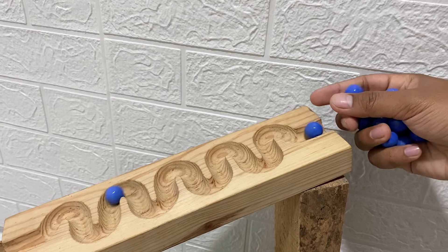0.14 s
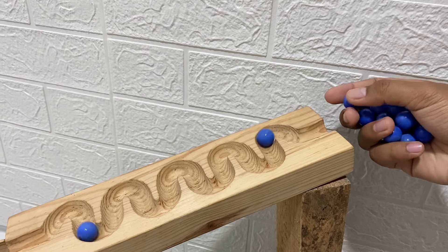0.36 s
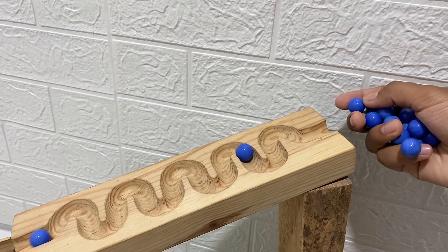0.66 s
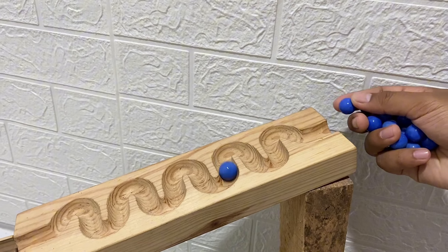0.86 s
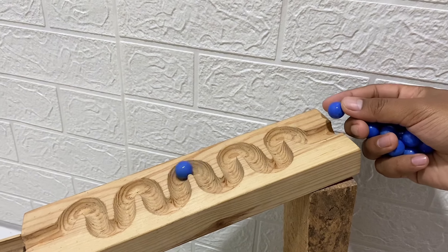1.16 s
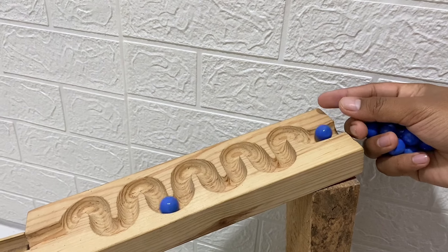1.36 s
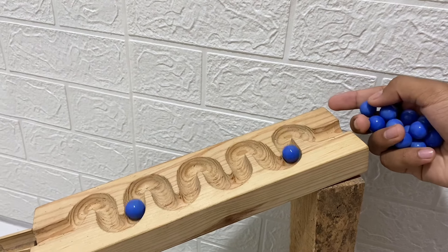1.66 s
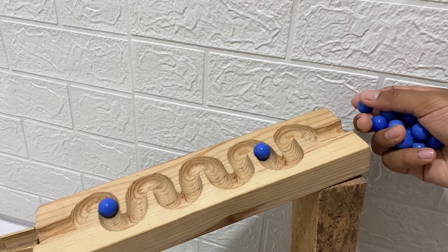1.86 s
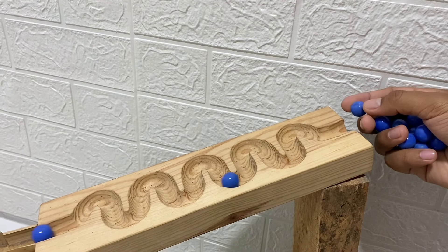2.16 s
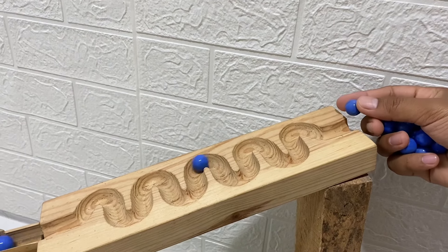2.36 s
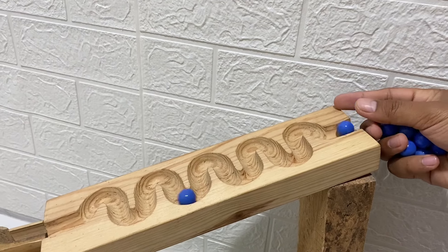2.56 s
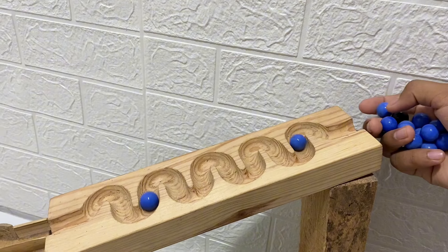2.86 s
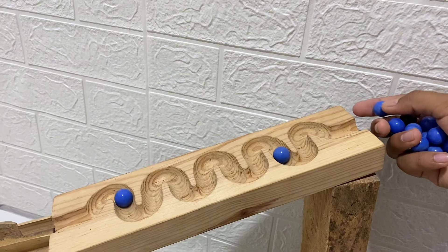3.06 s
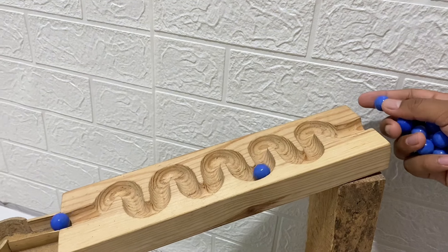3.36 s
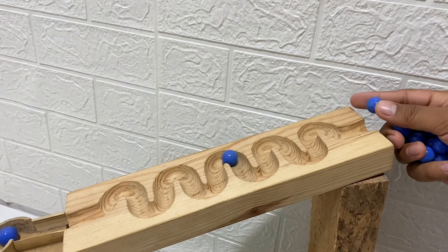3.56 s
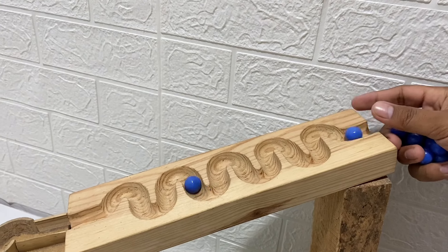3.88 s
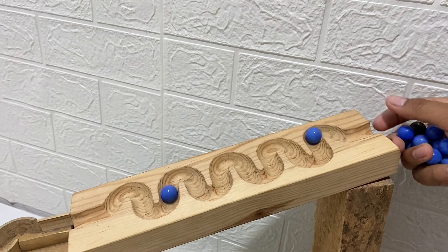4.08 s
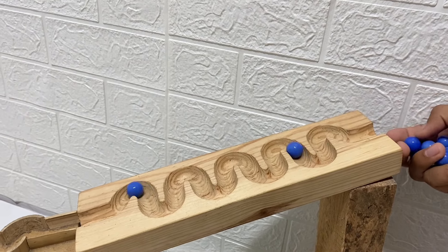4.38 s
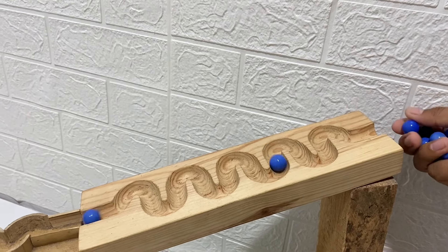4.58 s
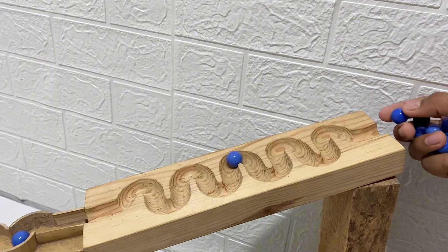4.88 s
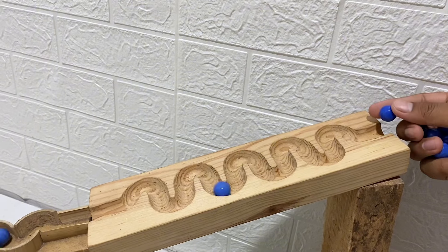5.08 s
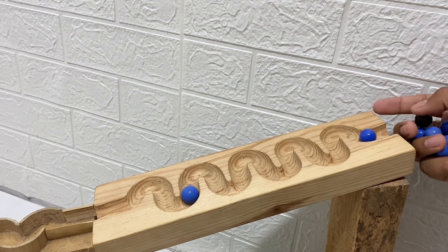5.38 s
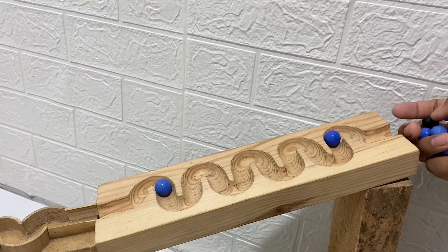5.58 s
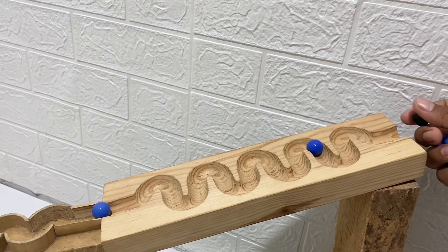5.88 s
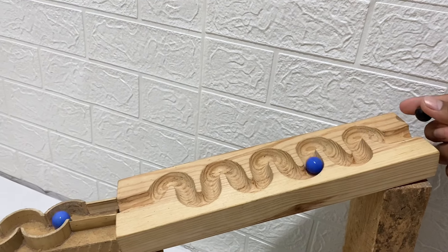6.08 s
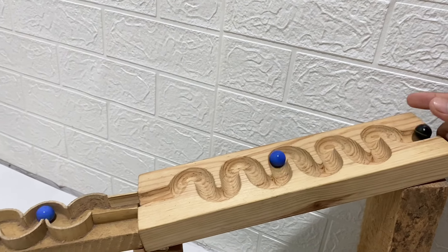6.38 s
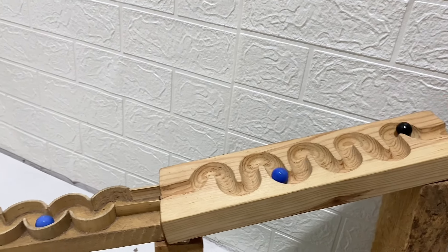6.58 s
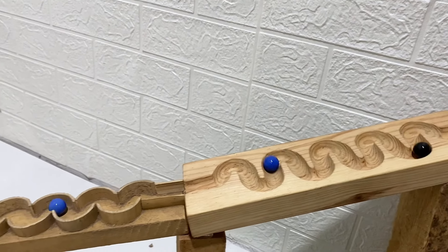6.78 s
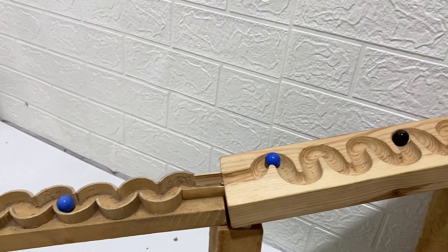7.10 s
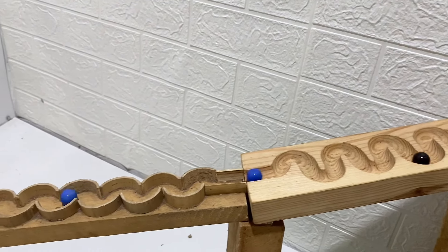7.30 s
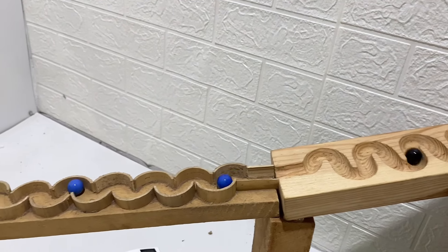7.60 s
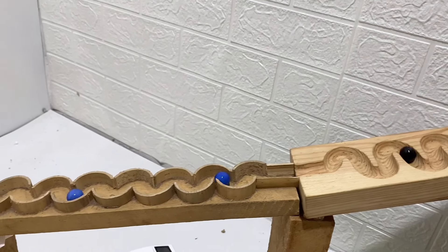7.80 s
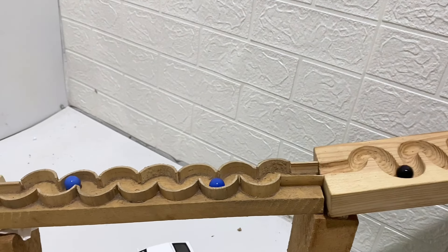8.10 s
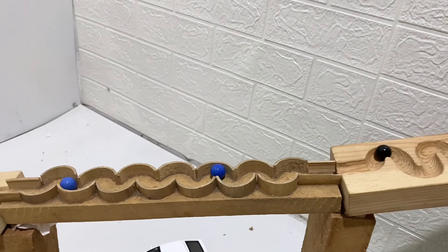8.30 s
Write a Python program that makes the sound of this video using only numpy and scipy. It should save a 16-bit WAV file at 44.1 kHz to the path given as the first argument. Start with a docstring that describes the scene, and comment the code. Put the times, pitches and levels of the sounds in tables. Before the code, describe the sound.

Small glass marbles are fed one by one into a winding wooden groove. Hard woody clacks and sharp ticks come in the first second and a half, then lighter irregular taps over a grainy rolling rumble. Near six seconds two loud cracks ring out, then fuller rolling and scattered clicks follow as marbles reach a lower track. Close stereo microphone, small bare room with short echo, low wavering hum behind.

```python
"""A low wavering motor hum and a soft rumble come first: glass marbles, fed one by one from a cupped
hand, run down winding wooden tracks in a bare room. Random bumps make the rolling, dying sines the knocks
on wood at each bend, short noise bursts the ticks of glass on glass and hard floor. The hum is a stack
of sines over dull noise, the room a random echo tail, and some marbles drone through a moving resonance."""
import sys
import numpy as np
from scipy import signal
from scipy.fft import rfft, irfft, next_fast_len
from scipy.io import wavfile
from scipy.ndimage import uniform_filter1d

SR = 44100
rng = np.random.default_rng(int(sys.argv[2]) if len(sys.argv) > 2 else 0)


def materialize(psi):
    """Save the field psi as 16-bit PCM at rate SR to the path in sys.argv[1].

    A 1-D psi becomes a single channel; in a 2-D psi each row is a channel.
    """
    bounded = np.clip(np.atleast_2d(psi).T, -1, 1)
    quanta = np.round(bounded * 32767).astype(np.int16)
    wavfile.write(sys.argv[1], SR, quanta)


N = 372644


def gain_of(db):
    """Turns decibels into a factor."""
    return 10 ** (np.asarray(db) / 20)


def evened(x):
    """Scales to an average (rms) strength of 1."""
    return x / np.sqrt(np.mean(x ** 2) + 1e-20)


def peaked(x):
    """Scales so the highest peak is 1."""
    return x / abs(x).max()


def read(points, hz):
    """Reads a table of (pitch, value) between its points, on a log-pitch axis."""
    f, value = np.transpose(points)
    return np.interp(np.log(hz + 1), np.log(f + 1), value)


def along(rows, column):
    """Makes a smooth volume curve from one dB column of a time table."""
    rows = np.array(rows)
    return gain_of(np.interp(np.arange(N) / SR, rows[:, 0], rows[:, column]))


def slow(seconds, count):
    """Makes smooth random drifts of rms 1; longer seconds drift more slowly."""
    step = 100  # samples between drift points
    rough = rng.standard_normal((count, N // step + 2))
    span = max(round(seconds * SR / step), 1)
    smooth = evened(uniform_filter1d(uniform_filter1d(rough, span), span))
    return [np.interp(np.arange(N) / step, np.arange(len(row)), row) for row in smooth]


def rings(hz, db, t60, phase, size):
    """Adds up dying sines; t60 is the time each takes to fall by 60 dB."""
    t = np.arange(size)[:, None] / SR
    return (gain_of(db - 60 * t / t60) * np.sin(2 * np.pi * hz * t + phase)).sum(1)


def bumps(per_s, spread_db, size):
    """Makes a random train of the tiny impacts of a rolling marble, a few of them large."""
    height = gain_of(spread_db * np.minimum(rng.exponential(1, (2, size)), 5))
    sign = rng.choice([-1., 1.], (2, size))
    return height * sign * (rng.random((2, size)) < per_s / SR)


# how alike left and right are in diffuse sound: (pitch [Hz], likeness [0-1])
LIKENESS = [(60, 1), (200, 0.88), (700, 0.4), (2000, 0.058), (8000, 0.35)]


def shaped(pair, db_of):
    """Colours two unrelated signals and makes them alike band by band, as two close microphone ports hear."""
    size = next_fast_len(pair.shape[1], True)
    hz = np.fft.rfftfreq(size, 1 / SR)
    left, other = rfft(pair, size)
    same = np.clip(read(LIKENESS, hz), 0, 1)
    right = same * left + np.sqrt(1 - same ** 2) * other
    return irfft(np.array([left, right]) * gain_of(db_of(hz)), size)[:, :pair.shape[1]]


# the distant motor before its random drift: (time [s], pitch [Hz], level within the hum [dB])
MOTOR_PATH = [(0, 33, 1), (1.3, 35, -2), (1.7, 34.6, 0), (2.2, 33.2, -1.5), (2.701, 35, -6),
              (3.4, 37.8, -2), (4, 36, 0), (5.8, 38, -7), (7.8, 37.45, -9), (8.45, 29.9, -2)]
# the tones of the hum before they swell: (multiple of the motor pitch, relative level [dB])
HUM_TONES = [(1, -21), (2, 1.5), (3, -3.5), (4, -9.5), (5, -11.5), (6, -14.5), (9, -14.5)]


def motor():
    """Stacks multiples of one drifting pitch, each swelling and fading on its own."""
    pitch = np.interp(np.arange(N) / SR, *np.transpose(MOTOR_PATH)[:2])
    wavering = pitch * (1 + .008 * slow(0.28, count=1)[0])
    turns = np.cumsum(wavering) / SR
    tones = np.zeros(N)
    for (multiple, db), swell in zip(HUM_TONES, slow(0.093, count=len(HUM_TONES))):
        wave = np.sin(2 * np.pi * (round(multiple) * turns + rng.random()))
        tones += gain_of(db + 2.4 * swell) * wave
    return along(MOTOR_PATH, column=2) * evened(tones)


# colour of the room air: (pitch [Hz], relative level [dB per Hz])
AIR_COLOUR = [(25, -19), (72, 7.5), (120, -7.5), (250, -12.5), (350, -7), (600, -15), (1500, -15),
              (4000, -49.5)]


def room_air():
    """Colours steady noise into the dull wash of room air."""
    return evened(shaped(rng.standard_normal((2, N)), lambda hz: read(AIR_COLOUR, hz)))


# base level of motor and air together: (time [s], level [dB])
HUM_LEVEL = [(0, -53), (.5, -43.5), (2.3, -48.5), (3.6, -49.5), (5.2, -52), (5.8, -45.5), (6.4, -49.5),
             (8.45, -50)]
# the hum dips briefly after two sharp cracks: (time [s], change of level [dB])
HUM_DIPS = [(1.021, -16), (6.05, -13)]
DIP_S = 0.088  # from the middle of a dip to where it is 1/e as deep in dB
AIR_DB = -1  # air level within the hum


def hum():
    """Mixes the motor tones with room air and lets the level drift and dip."""
    t = np.arange(N) / SR
    dip_db = sum(db * np.exp(-((t - s) / DIP_S) ** 2) for s, db in HUM_DIPS)
    return gain_of(dip_db) * along(HUM_LEVEL, column=1) * (motor() + gain_of(AIR_DB) * room_air())


# modes (natural tones) of the tracks, before each sound bends them:
# (pitch [Hz], relative level when knocked [dB], t60 [s], relative level when rolled on [dB])
WOOD_MODES = [(305, -5.5, 0.058, -33.5), (344, -6.5, 0.07, -5), (563, -6.5, 0.04, -40.5),
              (845, 9, 0.021, 12.5), (1043, 6.5, 0.025, 19), (1158, -5, 0.076, 21), (1287, -6, 0.052, 19.5),
              (1567, -8, 0.073, 21), (1733, 5, 0.026, 20), (1995, -1.5, 0.047, -6.5), (2161, 1, 0.044, 16),
              (2353, -5, 0.079, -24), (2700, 1, 0.038, -1), (3051, -3, 0.047, -25),
              (3244, -5.5, 0.055, -31.5), (3384, 2.5, 0.024, -28.5), (3736, -3, 0.032, -49.5),
              (4086, -8.5, 0.034, -23), (4783, -22, 0.028, -46), (5810, -41.5, 0.021, -43.5)]
DETUNE = 0.028  # the marble's place and weight shift a mode by up to half this share


def grain_rumble():
    """Lets bumps on the wood grain ring the track, damped by the marble's weight."""
    hz, _, t60, db = np.transpose(WOOD_MODES)
    body = rings(hz, db, 0.68 * t60, 0, size=4000)
    ringing = signal.oaconvolve(bumps(1500, 3.65, size=N), body[None], axes=1)[:, :N]
    return evened(shaped(ringing, np.zeros_like)) * gain_of(0.97 * slow(.025, count=1)[0])


def wall_taps():
    """Taps the groove wall now and then; an uneven handful of modes sounds briefly."""
    hz, knock_db, t60, _ = np.transpose(WOOD_MODES)
    taps, train = np.zeros(N), bumps(35, 3, size=N)[0]
    size = 1500
    onset = np.minimum(np.arange(size) / SR / 0.0017, 1)
    places = np.flatnonzero(train)
    for at, (spread, shift) in zip(places, rng.random((len(places), 2, len(hz)))):
        part = taps[at:at + size]
        tap_db = knock_db + 22 * spread - 8.2 * abs(np.log2(hz / 2200))
        tuned = hz * (1 + DETUNE * (shift - .5))
        tap = peaked(rings(tuned, tap_db, 1.06 * t60, 0, size=size) * onset)
        part += train[at] * tap[:len(part)]
    return evened(taps)


# colour of the fine grit: (pitch [Hz], relative level [dB per Hz])
GRIT_COLOUR = [(2000, -9), (3000, 1.5), (5300, -7.5), (8500, -22), (10100, -16), (12100, -27.5),
               (14300, -23.5), (16000, -51.5)]


def grit_treble():
    """Turns many fine bumps into a gritty treble that flickers."""
    grit = shaped(bumps(6000, 2.5, size=N), lambda hz: read(GRIT_COLOUR, hz))
    return evened(grit) * gain_of(5.1 * slow(0.023, count=1)[0])


# base levels of rolling in the grooves: (time [s], rumble level [dB], gritty treble level [dB])
ROLLING_LEVELS = [(0, -55, -53.5), (.3, -47, -53), (.9, -47, -79), (1.3, -55.5, -53), (2.0, -51.5, -72),
                  (2.45, -48, -54), (2.75, -49.5, -75), (3.15, -54.5, -77.5), (3.5, -55, -68),
                  (4.05, -55, -60.5), (4.301, -59.5, -68), (4.8, -50.5, -63), (5.12, -61.5, -86),
                  (5.3, -47.5, -75), (5.7, -57, -67), (6.2, -46.5, -53), (7.2, -43, -72), (7.9, -43.5, -63),
                  (8.45, -50, -64)]


def rolling():
    """Rolls marbles along the grooves: grain rumble, wall taps and fine grit, a little to the left."""
    wood = grain_rumble() + gain_of(-9) * wall_taps()
    rumble = along(ROLLING_LEVELS, column=1) * wood
    treble = along(ROLLING_LEVELS, column=2) * grit_treble()
    return gain_of([[1.5], [-1.5]]) * (rumble + treble)


FAINT_PER_S = 20
FAINT_DB, FAINT_SPREAD_DB = 14.5, 4.5  # over the base level of the gritty treble; random spread


def faint_ticks():
    """Lists small ticks at random moments, louder while the rolling is gritty."""
    s, _, grit_db = np.transpose(ROLLING_LEVELS)
    when, size, dull = rng.random((round(FAINT_PER_S * N / SR), 3)).T
    when = .01 + when * (N / SR - .01)
    peak_db = np.interp(when, s, grit_db) + FAINT_DB - FAINT_SPREAD_DB * np.log(size + 0.06)
    return list(zip(when, peak_db, 0.54 + 0.38 * dull))


KNOCK_SIZE = 4000  # samples in one blow
LOW_HZ = 1500  # modes below this are the low ones
SKEW = 0.99  # most radians by which the wood's ring differs between the two ports
LINGER = 1.38  # the main mode rings this much longer
CRACK_DB, CRACK_T60 = -20, 0.031  # level under the ring; time [s] to fall by 60 dB
CRACK_BAND = signal.butter(2, [700, 5500], "band", fs=SR)  # Hz
CHATTER_S, CHATTER_DB, CHATTER_FADE_DB = .06, -16.5, -14.5  # span, first level, fade over the span


def crack():
    """Blurs the many small modes of the wood into a short noise."""
    fade = gain_of(-60 * np.arange(KNOCK_SIZE) / SR / CRACK_T60)
    noise = signal.lfilter(*CRACK_BAND, rng.standard_normal((2, KNOCK_SIZE))) * fade
    return peaked(noise + noise[::-1] / 2)  # each side also hears half of the other


def rebounds(late, sign):
    """Makes a blow followed by a few small rebounds, the later the weaker."""
    train = np.zeros(round(CHATTER_S * SR) + 200)
    at = (200 + late * CHATTER_S * SR).astype(int) - 1
    train[at] = sign * gain_of(CHATTER_DB + CHATTER_FADE_DB * late)
    train[0] = 1
    return train


def add(mix, s, sound, pan_db):
    """Places a sound at its time, between left and right."""
    part = mix[:, round(s * SR):][:, :sound.shape[1]]
    part += gain_of([[pan_db / 2], [-pan_db / 2]]) * sound[:, :part.shape[1]]


# marble against wood or floor: (time [s], level of the blow before panning [dB], strongest pitch [Hz])
KNOCK_ROWS = [(0.084, -24, 2000), (0.089, -11.5, 1136), (0.152, -20, 1120), (0.188, -2.5, 1700),
              (0.242, -20, 1740), (0.742, -25, 2730), (0.755, -22.5, 2730), (0.813, -12.5, 2160),
              (0.839, -34, 2160), (0.935, -8.5, 2030), (1.111, -36.5, 2170), (1.27, -2.5, 1740),
              (1.341, -15, 1730), (1.351, -18, 3120), (1.389, -22.5, 1820), (1.473, -30.5, 1410),
              (1.98, -29, 1170), (2.205, -20.5, 1920), (2.294, -13.5, 2176), (2.449, -28, 2160),
              (2.506, -29.5, 1150), (2.546, -21.5, 1960), (2.56, -21.5, 1140), (2.753, -32, 1030),
              (2.857, -28, 1724), (3.22, -38.5, 2206), (3.33, -32.5, 1280), (3.356, -30, 3100),
              (3.372, -26, 1990), (3.439, -16, 2160), (3.596, -28.5, 2160), (3.714, -32, 2160),
              (3.79, -26, 1123), (3.83, -23.5, 1990), (3.843, -22.5, 3260), (3.862, -24, 1220),
              (3.891, -31, 1160), (3.956, -12, 1290), (3.977, -24.5, 1740), (4.04, -33.5, 1150),
              (4.361, -34.5, 2230), (4.408, -45, 2160), (4.459, -33, 3140), (4.527, -35, 2160),
              (4.622, -32, 1160), (4.645, -31.5, 1150), (4.688, -11.5, 2160), (4.722, -20, 2160),
              (4.8, -44, 3700), (4.844, -23.5, 2160), (4.903, -32, 1570), (4.974, -40, 2160),
              (4.999, -35, 1283), (5.011, -36, 2170), (5.171, -36.5, 2150), (5.268, -23.5, 1125),
              (5.288, -24, 1980), (5.302, -23.5, 3260), (5.319, -29, 1150), (5.329, -21, 1180),
              (5.395, -32.5, 2160), (5.451, -44, 1290), (5.49, -19.5, 1288), (5.534, -22, 1310),
              (5.565, -30, 1290), (5.633, -42, 2160), (5.694, -46, 2160), (5.724, -41, 2160),
              (5.818, -32, 2160), (5.887, -22.5, 2010), (5.948, -14.5, 2147), (5.956, -4.5, 2598),
              (6.201, -15.5, 1570), (6.274, -0.5, 1745), (6.329, -15.5, 2700), (6.34, -16, 1570),
              (6.361, -26, 2700), (6.402, -15.5, 1132), (6.469, -17, 1170), (6.498, -12.5, 1290),
              (6.653, -32.5, 2160), (6.981, -28, 1040), (7.01, -32, 1150), (7.017, -44, 3050),
              (7.055, -30.5, 2200), (7.102, -34, 1570), (7.137, -31.5, 1567), (7.244, -49, 2160),
              (7.357, -19.5, 2720), (7.427, -15, 2160), (7.581, -31.5, 2200), (7.763, -19.5, 2020),
              (7.797, -31, 1290), (7.81, -22, 1290), (7.845, -15.5, 1560), (7.865, -24.5, 2720),
              (7.974, -16, 2280), (8.004, -14, 2800), (8.015, -12.5, 2720), (8.025, -21.5, 1170),
              (8.212, -31, 578)]
# each pitch belongs to a spot on the tracks: (pitch [Hz], how far it stands out [dB], low modes [dB],
# left over right [dB], partner mode [Hz], how far the partner stands out [dB], rise time [s])
TRACK_SPOTS = [(1158, 8.5, 1.5, 3.5, 2600, 16, 0.0017), (1305, 16, -4, 6, 3057, 13.5, 0.0033),
               (1520, 12, -9, 8, 1900, 22, 0.0004), (1730, 7.5, -4.5, 3.5, 858, 8, 0.00094),
               (2080, 5, -4.5, 5, 4110, 0, 0.00065), (2084, 13.5, -6, 7, 3732, 14, 0.00088),
               (2314, 9.5, -3, 5, 626, 21, 0.0014), (2650, 6, -5.5, 5, 990, 11, 0.00081),
               (3200, 4, 7.5, 2, 1400, 14, 0.001)]


def knocks():
    """Strikes spots that favour two modes and scatter the rest; hard blows die sooner, then rebound."""
    hz, db, t60, _ = np.transpose(WOOD_MODES)
    spot_hz = np.transpose(TRACK_SPOTS)[0]
    skew = SKEW * np.clip(hz / LOW_HZ, 0, 1)
    t = np.arange(KNOCK_SIZE) / SR
    out = np.zeros((2, N))
    draws = rng.random((len(KNOCK_ROWS), 4, len(hz)))
    for (s, peak_db, ring_hz), (spread, phase, shift, hops) in zip(KNOCK_ROWS, draws):
        spot = TRACK_SPOTS[abs(np.log(spot_hz / ring_hz)).argmin()]  # nearest in pitch
        _, stand_db, low_db, pan_db, partner_hz, partner_db, rise_s = spot
        # closeness of every mode to the main pitch and to its partner, 0-1
        first, second = np.exp(-(np.log2(hz / [[ring_hz], [partner_hz]]) / 0.067) ** 2)
        favour_db = stand_db * first + partner_db * second
        favour_db = favour_db * np.interp(peak_db, [-12, -3], [1, .6])  # less on hard blows
        octaves = abs(np.log2(hz / ring_hz))
        place_db = favour_db - 3 * octaves + 7 * (spread - .5) + low_db * (hz < LOW_HZ)
        length = np.interp(peak_db, [-16, -6], [.8, .5]) * LINGER ** first * 0.8 ** second
        tuned = hz * (1 + DETUNE * (1 - first) * (shift - .5))
        ring = np.array([
            rings(tuned, db + place_db, t60 * length, 1.77 * phase + side * skew, size=KNOCK_SIZE)
            for side in (-.5, .5)])
        blow = peaked(ring) + gain_of(CRACK_DB) * crack()
        blow = peaked(blow * (1 - np.exp(-(t / rise_s) ** 2)))  # soft start
        train = rebounds(hops[:5], np.sign(hops[5:10] - .5))
        add(out, s, gain_of(peak_db) * signal.fftconvolve(blow, train[None], axes=1), pan_db)
    return out


# hard glass contact: (time [s], peak level [dB], share of dull colour [0-1])
TICK_ROWS = [(0.0884, -15.5, 0.99), (0.1882, -9.5, 0.4), (0.3055, -25, 0), (0.39, -26.5, 0.1),
             (0.4272, -16.5, 0.07), (0.4756, -21, 0.08), (0.554, -21, 0.4), (0.6035, -17, 0.26),
             (0.8131, -37, 0.97), (0.924, -22, 0.5), (0.9331, -3, 0.19), (1.1108, -25.5, 0.92),
             (1.27, -13.5, 0.03), (1.3396, -27, 0.5), (1.4426, -31.5, 0.99), (1.985, -34, 0.5),
             (2.151, -24, 0.25), (2.2935, -23, 1), (2.3181, -21, 0.36), (2.4505, -20.5, 0.27),
             (2.562, -23.5, 0.89), (2.608, -28, 0.9), (2.6292, -22, 0.4), (2.753, -40, 0.8),
             (2.773, -33, 0.96), (2.9288, -30.5, 0.85), (2.985, -35, 0.5), (3.049, -34, 1), (3.109, -42, 1),
             (3.218, -29, 0.98), (3.3305, -34, 0.94), (3.4172, -20.5, 0.23), (3.481, -20.5, 0.84),
             (3.556, -24, 0.97), (3.7138, -24.5, 0.98), (3.7943, -37, 0.9), (3.9577, -25, 1),
             (4.0205, -23.5, 0.53), (4.335, -36.5, 0.78), (4.5121, -26, 0.93), (4.6091, -21, 0.18),
             (4.6513, -23, 0.93), (4.6897, -20.5, 1), (4.8, -26, 1), (4.845, -22.5, 0.9),
             (4.9018, -18, 0.94), (4.9625, -25, 0.99), (5.011, -29.5, 1), (5.1671, -25, 0.73),
             (5.2738, -40, 0.4), (5.301, -30, .9), (5.394, -41, 0.88), (5.562, -25.5, 0.4),
             (5.57, -37, .95), (5.627, -35, 1), (5.692, -42.5, 0.94), (5.8006, -25.5, 0.94),
             (5.9455, -21, 0.8), (5.9562, -4.5, 0.06), (6.175, -31, 0.8), (6.197, -28, 0.96),
             (6.2753, -10.5, 0.2), (6.3414, -18.5, 0.73), (6.401, -24, 1), (6.4685, -19, 1),
             (6.61, -23.5, 0.97), (6.6432, -29.5, 0.92), (6.761, -48, 0.4), (6.7754, -19, 0),
             (6.7864, -20, 0.1), (6.7979, -18.5, 0.14), (6.8208, -18.5, 0.15), (6.8746, -26, 0.7),
             (6.9458, -19, 0.13), (6.9583, -14.5, 0.13), (7, -19, 0.3), (7.017, -25, 0.55), (7.096, -37, 1),
             (7.2083, -27.5, 0.04), (7.2659, -17, 0.93), (7.4086, -22, 0.8), (7.443, -19.5, 0.66),
             (7.5425, -26, 0.78), (7.5752, -27, 0.66), (7.6426, -28, 0.85), (7.715, -26.5, 0.95),
             (7.8426, -33, 0.76), (7.981, -20.5, 1), (8.1005, -24.5, 0.92), (8.2487, -30.5, 0.87),
             (8.276, -50, .95)]
# duller part of a glass contact: (pitch [Hz], level [dB])
DULL_COLOUR = [(1500, 1), (3500, 2.5), (5300, 5.5), (6800, -7.5), (8000, -15), (10000, -58), (16000, -37)]
# sharp colour of the ticks, a bright peak between two dips: (pitch [Hz], level [dB])
SHARP_COLOUR = [(4000, -16), (7000, -2.5), (8400, -5), (9500, 4), (11000, 0.5), (12000, -18), (13800, -9),
                (16000, -32.5)]
TICK_LEAD_S = .002  # quiet space before the contact


def ticks():
    """Makes short noise bursts, as glass barely gives: a dull and a sharp colour, uneven between ports."""
    size = 1024
    out, hz = np.zeros((2, N)), np.fft.rfftfreq(size, 1 / SR)
    since = np.arange(size) / SR - TICK_LEAD_S
    shape = np.clip(since / 0.0001, 0, 1) * gain_of(-60 * since / 0.025)
    dull_gain, sharp_gain = gain_of(read(DULL_COLOUR, hz)), gain_of(read(SHARP_COLOUR, hz))
    rows = TICK_ROWS + faint_ticks()
    for (s, peak_db, dull), (a, b) in zip(rows, rng.standard_normal((len(rows), 2, size))):
        dull = np.clip(dull, 0, 1)
        colour = dull * dull_gain + np.sqrt(1.01 - dull ** 2) * sharp_gain
        noise = shape * np.array([a + b, a - 0.74 * b])
        burst = peaked(irfft(rfft(noise) * colour))
        add(out, s - TICK_LEAD_S, gain_of(peak_db) * burst, 0)
    return out


# how long echoes last: (pitch [Hz], t60 [s])
ROOM_DECAY = [(250, 0.16), (1000, 0.26), (3000, 0.28), (8000, 0.31), (14000, 0.1)]


def room(x):
    """Echoes a sound with sparse random taps from the first wall echo on, each band dying at its own speed."""
    first, gap = 560, 20  # samples
    taps = np.zeros((2, SR))
    starts = np.arange(first, SR - gap, gap)
    at = starts + rng.integers(0, gap, (2, len(starts)))
    np.put_along_axis(taps, at, rng.choice([-1., 1.], at.shape), 1)
    hz, t, bands = signal.stft(shaped(taps, np.zeros_like), SR, nperseg=256)
    fade = gain_of(-60 * t / read(ROOM_DECAY, hz)[:, None])
    tail = signal.istft(bands * fade, SR, nperseg=256)[1]
    return signal.fftconvolve(x[None], tail / np.linalg.norm(tail[0]), axes=1)[:, :N]


# fallen marbles roll away over the floor, one list each: (time [s], level [dB], drone pitch [Hz])
FLOOR_MARBLES = [
    [(1.4, -40.5, 1170), (1.706, -41, 1078), (2.35, -52, 1290)],
    [(6.6, -53, 1010), (6.932, -44, 1070), (7.4, -59, 1080)],
]
# marbles drone along the thin lower track: (time [s], level [dB], drone pitch [Hz])
LOWER_TRACK = [(7.4, -63, 624), (7.592, -49, 630), (8.45, -52, 610)]


def drones():
    """Drives a broad resonance with bumps; its pitch drifts as the marble travels."""
    out = np.zeros((2, N))
    for rows in FLOOR_MARBLES + [LOWER_TRACK]:
        s, db, hz = np.transpose(rows)
        t = np.arange(s[0], s[-1] - 2 / SR, 1 / SR)
        turn = np.exp(2j * np.pi * np.cumsum(np.interp(t, s, hz)) / SR)
        r = np.exp(-np.pi * .3 * hz.mean() / SR)  # sets how broad the resonance is
        drive = shaped(bumps(1200, 3.4, size=len(t)), np.zeros_like)
        # shift the moving pitch down to zero, smooth there, then shift it back
        drone = (turn * signal.lfilter([1], [1, -2 * r, r * r], drive / turn)).real
        fade_in = np.clip((t - s[0]) / 0.044, 0, 1)
        drone = evened(drone) * gain_of(np.interp(t, s, db)) * fade_in
        add(out, s[0], drone, 4)
    return out


def scene():
    """Mixes the hits and their room tails over rolling, drones and hum."""
    wood, glass = knocks(), ticks()
    wet = gain_of(-8.0) * wood.mean(0) + gain_of(-10) * glass.mean(0)
    return hum() + rolling() + wood + glass + room(wet) + drones()


# how far the left port leads the right: (pitch [Hz], phase lead [radians])
LEFT_LEAD = [(0, 0), (6400, .5), (8350, -3.5), (13400, -12), (16100, -16)]
EDGE_HZ = 16500  # the treble ends here


def record(dry):
    """Shifts phase between two ports a little apart, softly limits the peaks, then cuts the top treble."""
    size = next_fast_len(N, True)
    hz = np.fft.rfftfreq(size, 1 / SR)
    lead = np.exp(.5j * np.interp(hz, *np.transpose(LEFT_LEAD)))  # half the lead for each port
    ports = irfft(rfft(dry, size) * np.array([lead, 1 / lead]), size)[:, :N]
    lowpass = signal.firwin(511, EDGE_HZ, window=("kaiser", 9), fs=SR)
    return signal.oaconvolve(np.tanh(ports), lowpass[None], "same")


dry = scene()
out = record(dry)
materialize(out)
```